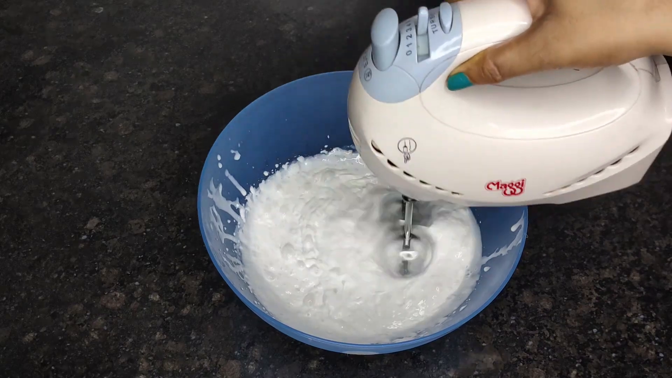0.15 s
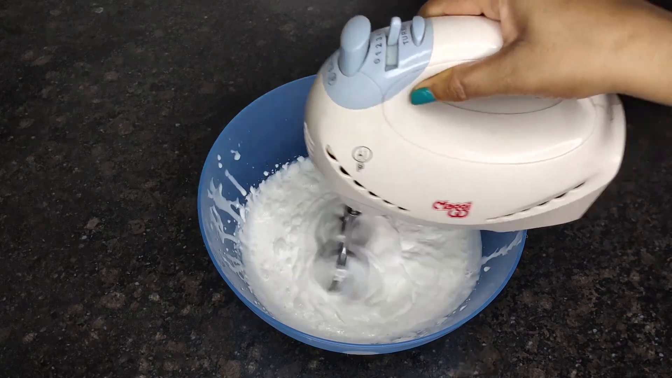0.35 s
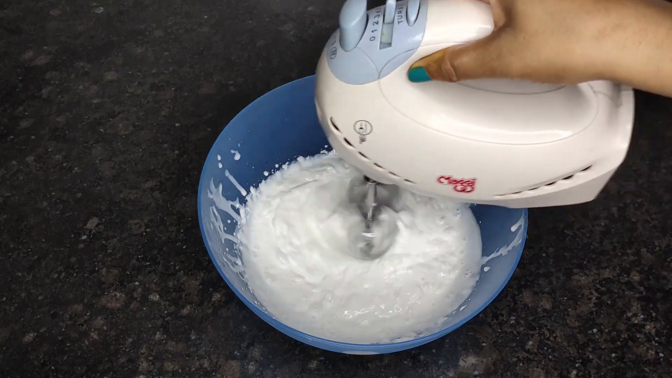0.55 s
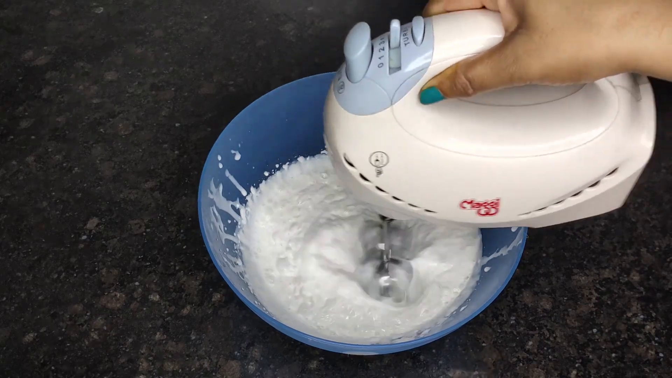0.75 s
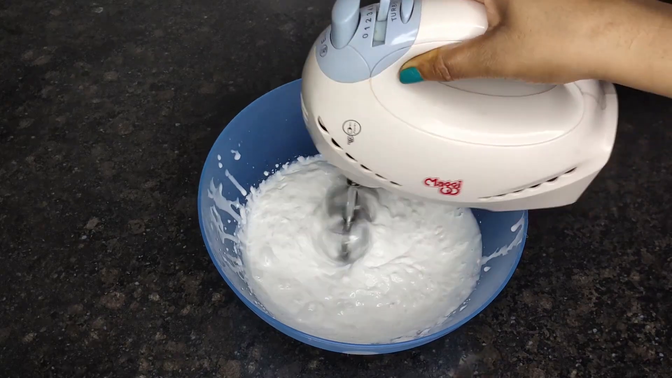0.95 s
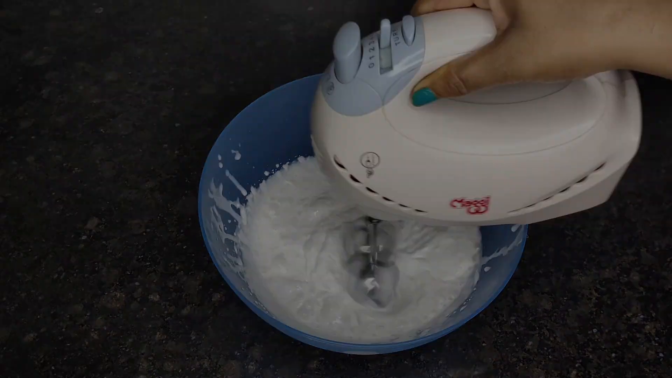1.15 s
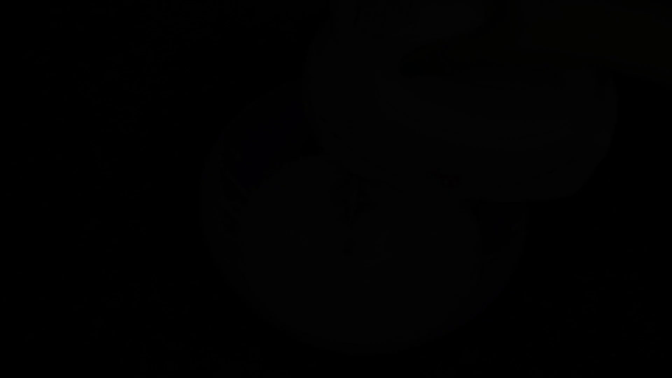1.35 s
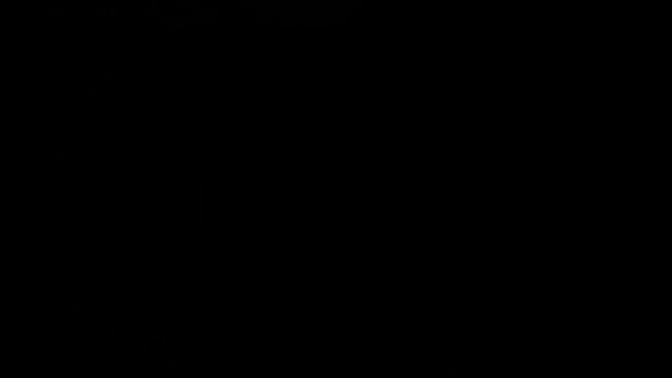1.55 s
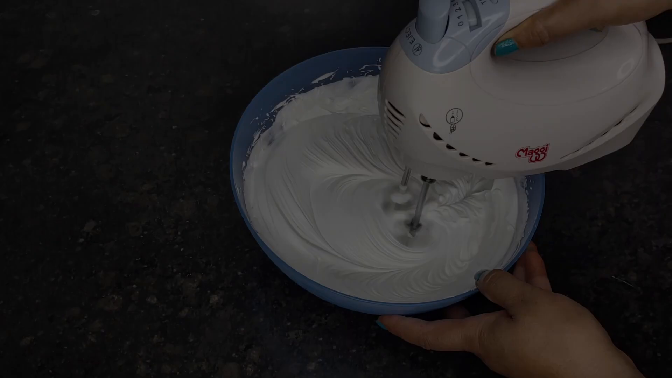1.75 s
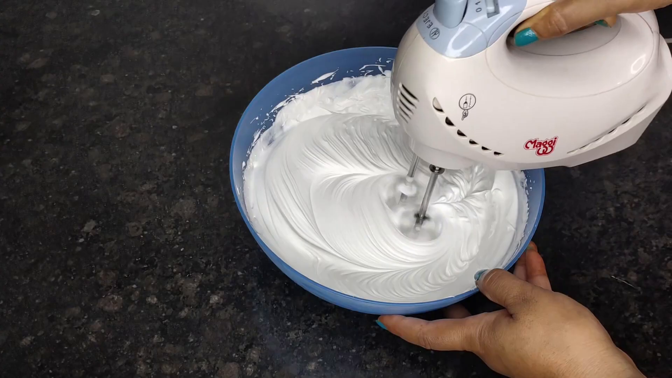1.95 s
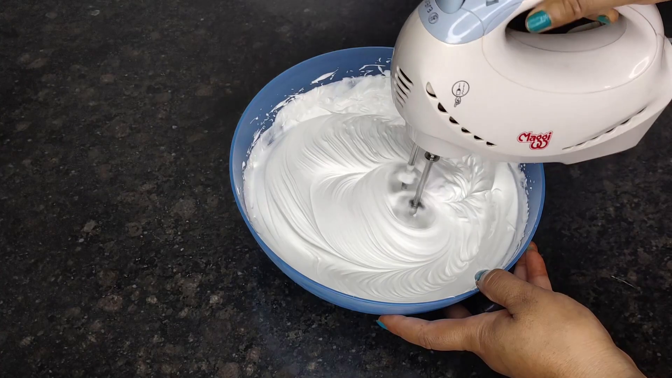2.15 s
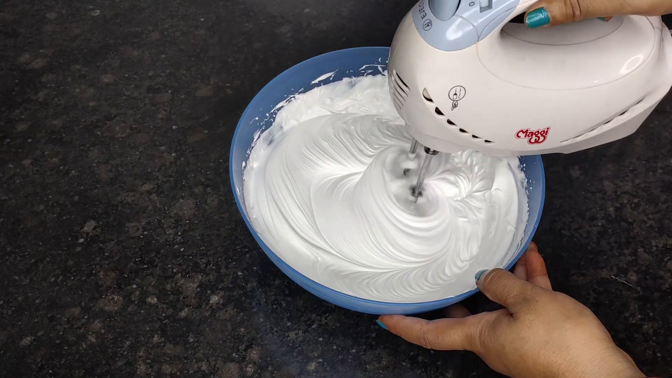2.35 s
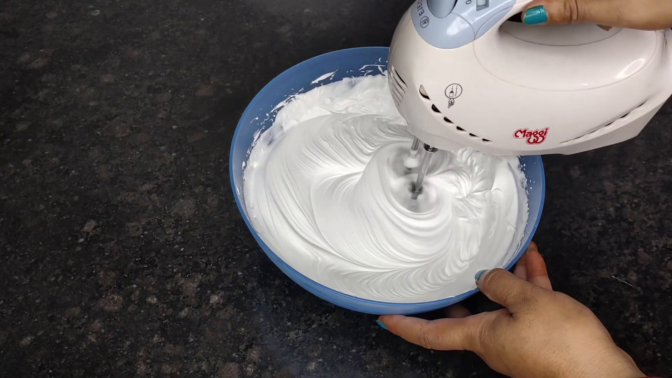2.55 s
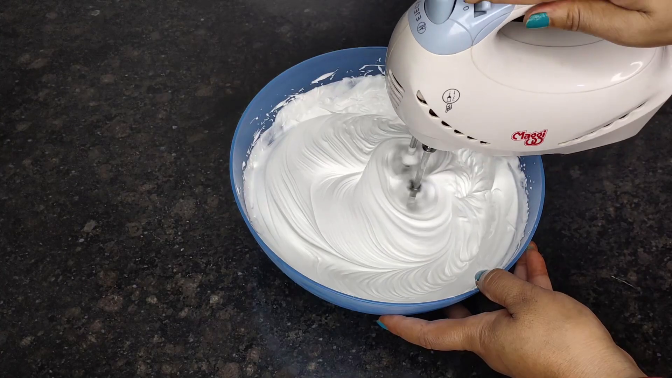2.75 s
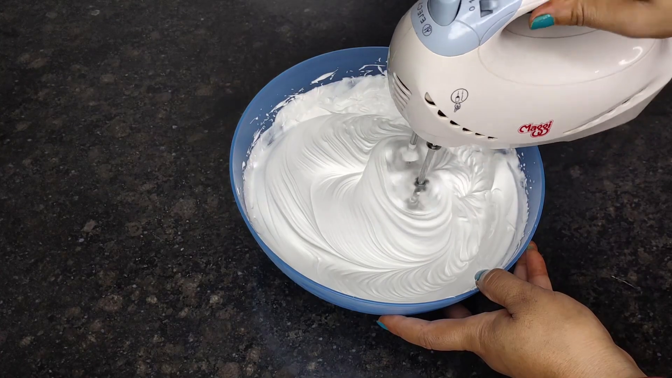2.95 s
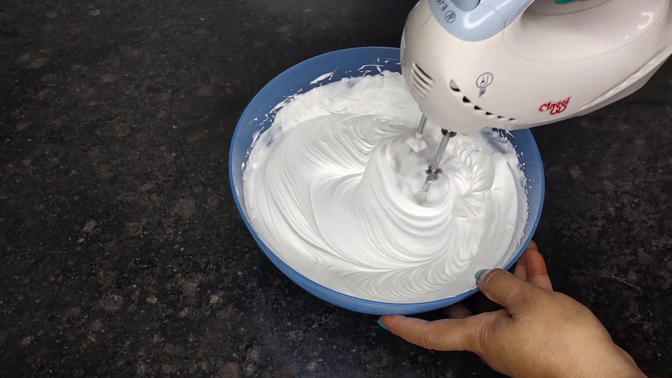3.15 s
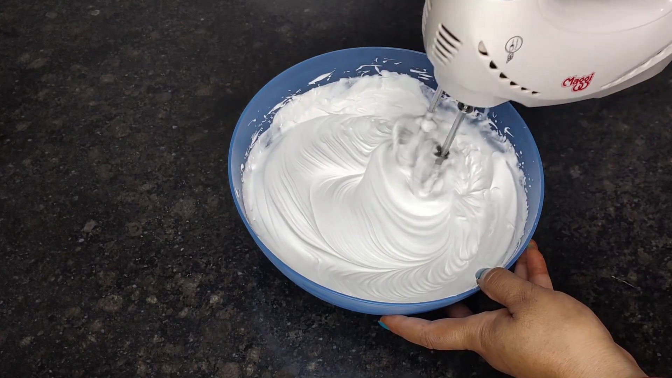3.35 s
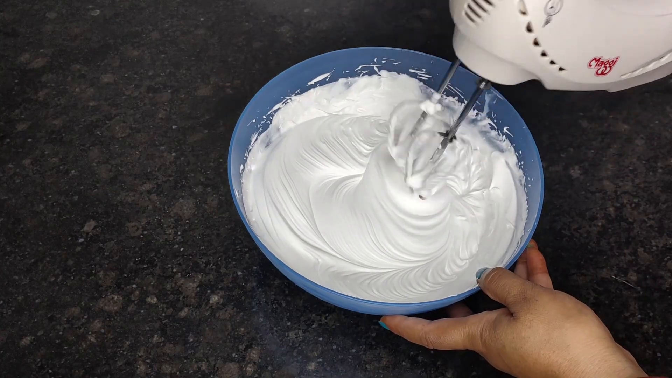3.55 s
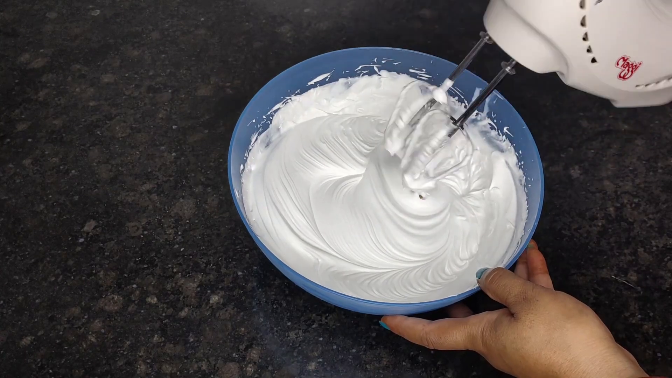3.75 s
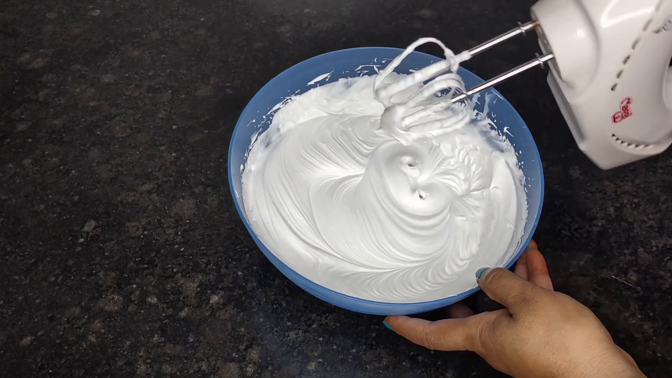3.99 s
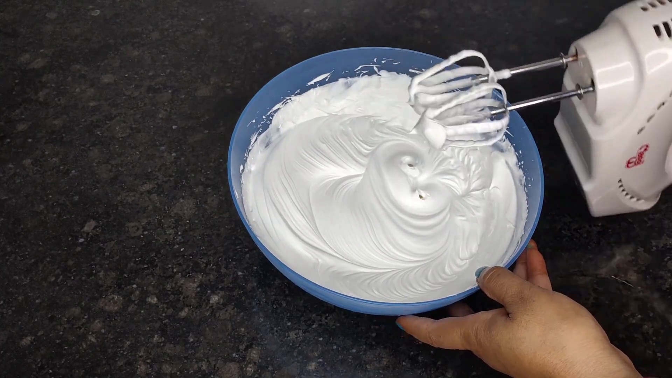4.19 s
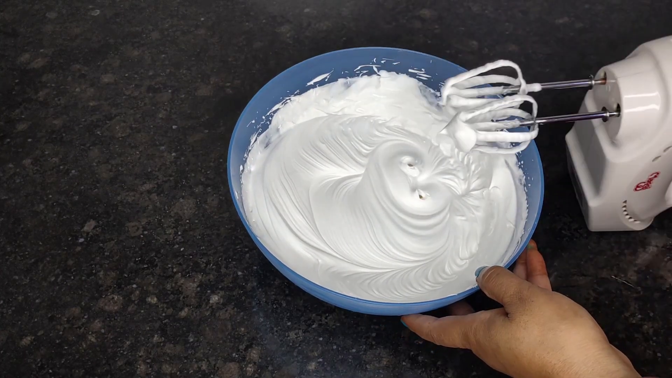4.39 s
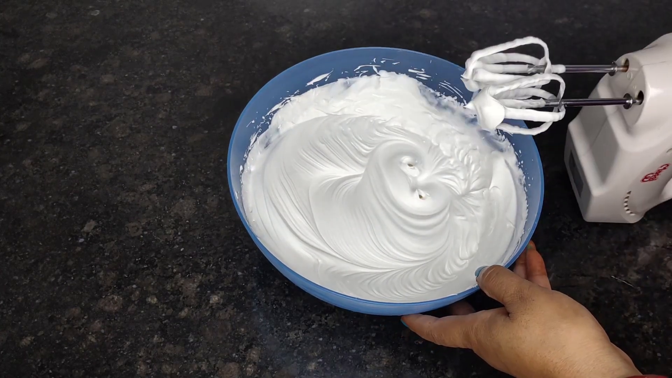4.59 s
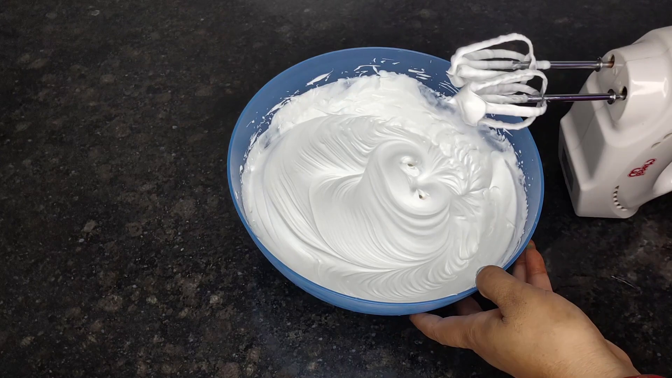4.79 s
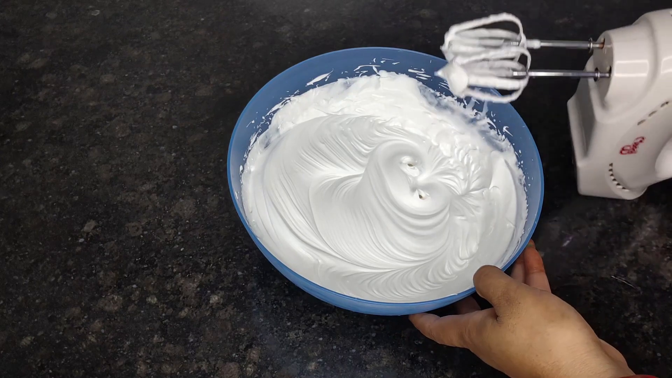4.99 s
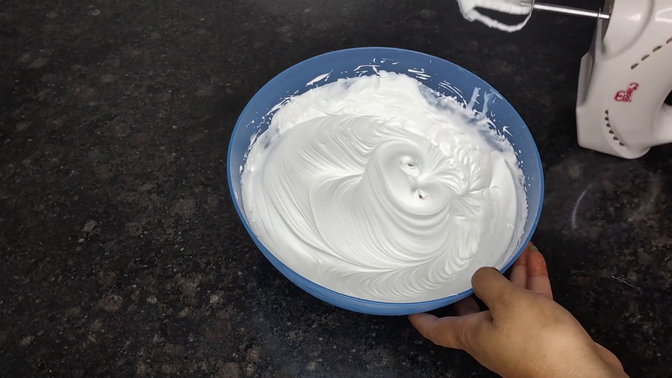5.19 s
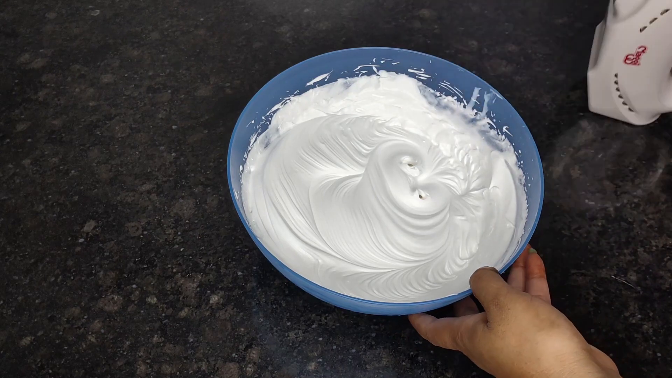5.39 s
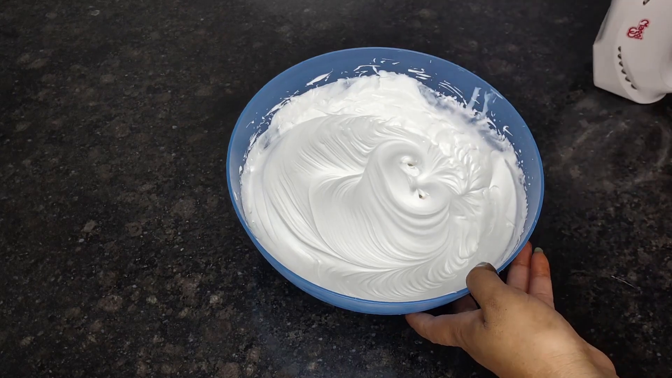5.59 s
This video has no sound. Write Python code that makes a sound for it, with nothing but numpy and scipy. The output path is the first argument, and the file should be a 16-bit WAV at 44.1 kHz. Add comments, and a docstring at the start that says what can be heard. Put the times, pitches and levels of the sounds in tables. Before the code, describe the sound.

A close mono pickup in a small kitchen. From 0 s an electric hand mixer runs at steady speed in runny cream: a hum near 650 Hz, high whines, gear rattle, brush hiss, wet slaps and small beater taps on the plastic bowl, strongest around 0.8-1.1 s. The level dips to a very short silence at about 1.55 s, then returns in stiff cream with less hum; from 1.9 s the hiss is clearly brighter. From 2.15 to 3.1 s the bowl groans on a slowly sinking note, with taps near 2.6-2.9 s. At 2.9 s the motor is switched off and coasts down, hollow tones fluttering and shooting upward near 3.7-3.9 s with a spray of hiss. Gears rattle unevenly to rest by 4.3 s, with a squeak at 4.0 s. Then quiet: a plastic knock at 4.5 s, scrapes and squeaks around 4.9-5.1 s, juddering worktop contacts at 5.2-5.3 s, soft hiss remaining.

```python
"""Whipping cream in a small kitchen

One microphone hears an electric hand mixer in a plastic bowl: shaft tones whine, grains of noise make
the thuds, slaps and gear rattle, and filtered noise makes the brush hiss. A cut with a moment of silence
parts runny from stiff cream, where the hiss is brighter; the bowl groans on a sinking, rubbed note. The
motor is switched off and coasts down as the beaters lift out. Noise bursts knock the mixer and set it down
on the worktop; damped tones ring and squeak. Room tone and mains hum lie beneath; a soft hiss remains."""
import sys
import numpy as np
from scipy import signal
from scipy.fft import rfft, irfft, next_fast_len
from scipy.io import wavfile
from scipy.ndimage import map_coordinates

SR = 44100
rng = np.random.default_rng(int(sys.argv[2]) if len(sys.argv) > 2 else 0)


def log_audio(samples):
    """Write samples as a 16-bit WAV file to the path given in sys.argv[1]."""
    # one column per channel
    frames = np.atleast_2d(samples).T
    # limit to full scale, then quantise
    limited = np.clip(frames, -1, 1)
    pcm = np.round(limited * 32767).astype(np.int16)
    wavfile.write(sys.argv[1], SR, pcm)


N = 248278
TIME = np.arange(N) / SR
TOP_HZ = 15700  # band limit of the recorder

# Every level_db below is a starting level, which the source may trim or shape.
# Motor speed under power, giving with the load: start_s, turns_per_s
SHAFT_SPEED = [(0, 330.5), (.344, 327.4), (.582, 329), (.808, 327.5), (.842, 325.7), (.94, 327.2),
               (1.274, 326.6), (1.422, 328.3), (1.6, 326.2), (1.916, 327.3), (2.3, 328)]
# Motor tones: multiple of the shaft speed, runny_level_db, stiff_level_db
SHAFT_TONES = [(1.997, -33.5, -47), (8.98, -53, -60), (11.95, -52.5, -55), (14, -54, -53),
               (15.02, -54.5, -46), (17, -54, -53.5), (17.98, -53, -60), (19.04, -52.5, -53),
               (20.12, -48, -47.5), (21.1, -47.5, -55), (22.05, -47, -44.5), (23.93, -47.5, -46),
               (25.06, -48.5, -55.5), (27, -57.5, -60), (29, -58.5, -50.5), (30.8, -54, -52.5),
               (32.1, -56, -57), (34.14, -53.5, -59.5), (35.6, -55, -61.5), (37.4, -56.5, -64),
               (39, -63, -62.5)]
# A cut with a moment of silence parts the two stages: start_s, end_s
CUT = (1.544, 1.584)
# Colour of the runny cream: pitch_hz, level_db
RUNNY_COLOUR = [(60, -43.5), (110, -35), (170, -18), (267, -12), (310, -14.5), (411, -15.5), (491, -10),
                (545, -8.5), (652, -3), (713, -9.5), (904, -17.5), (1270, -14), (1710, -24.5),
                (2310, -22.5), (3500, -32.5)]
# Colour of the stiff cream with the beaters deep: pitch_hz, level_db
STIFF_COLOUR = [(53, -66.5), (90, -18), (140, -21.5), (194, -10), (247, -10), (357, -9), (398, -14.5),
                (463, -7.5), (516, -14), (620, -6), (868, -11.5), (1220, -7.5), (1680, -19), (2140, -15.5),
                (3500, -26.5), (4550, -56.5), (7700, -120)]
# Colour with the beaters lifted free: pitch_hz, level_db
FREE_COLOUR = [(120, -73), (200, -44), (263, -20.5), (312, -30.5), (347, -16.5), (405, -18.5), (460, -1),
               (545, -4.5), (650, -3), (760, -11), (900, -2.5), (1040, -6), (1310, 0), (1710, -13.5),
               (2140, -8.5), (2590, -17.5), (3500, -39), (4550, -43), (7700, -120)]
# Colour of the brush hiss in runny cream: pitch_hz, level_db
RUNNY_HISS = [(2500, 7.5), (2800, 1), (3400, -6.5), (3900, -5), (7500, -6), (8600, -8.5), (12000, -13.5),
              (15500, -22)]
# Colour of the brush hiss in stiff cream: pitch_hz, level_db
STIFF_HISS = [(1470, -33.5), (2500, -4), (2780, -1.5), (3520, -10), (3800, -5), (4750, -1.5), (5920, -4.5),
              (7170, -2), (8230, -3), (10100, -3.5), (12400, -13.5), (14100, -14.5), (15500, -19.5)]
# Colour of the room tone: pitch_hz, level_db
ROOM_COLOUR = [(25, -3.5), (170, -7), (290, -9), (420, -8.5), (900, -10), (1400, -23.5), (1900, -33.5),
               (15000, -39)]
# Colour of the soft hiss that remains: pitch_hz, level_db
LATE_HISS_COLOUR = [(1500, -31.5), (2500, -24.5), (2900, -6), (4800, -3), (9800, -5.5), (15500, -14)]
# Colour of the knocked case: pitch_hz, level_db
KNOCK_COLOUR = [(150, -53.5), (250, -30), (371, -20), (480, -3), (540, 1), (640, -8), (750, -6.5),
                (844, -4.5), (1090, -20.5), (1240, -11.5), (1890, -30.5), (2850, -27.5), (4600, -21),
                (5850, -31), (9450, -33), (15000, -47.5)]
# Colour of the heel on the worktop: pitch_hz, level_db
HEEL_COLOUR = [(110, -58), (180, -40), (280, -9.5), (443, -4), (522, -2.5), (689, -2.5), (811, -20.5),
               (1020, -5.5), (1440, -11.5), (1930, -23), (2200, -17.5), (9000, -27), (14000, -47)]
# Resonances of bowl and beaters: pitch_hz, width_hz, lift_db
BOWL_MODES = [(272, 26, 3.5), (457, 32, 2.5), (575, 46, 4.5), (752, 44, 6.5)]
# The beaters strike the bowl: start_s, level_db, pitch_hz
STRIKES = [(.074, -20, 534), (.365, -19.5, 502), (.474, -23.5, 640), (0.502, -24.5, 956),
           (.821, -17.5, 670), (.847, -14, 630), (.862, -16.5, 774), (.902, -19, 476.6),
           (1.087, -13.5, 640), (1.719, -24.5, 474), (1.721, -29.5, 250), (2.18, -20, 653),
           (2.61, -21.5, 940), (2.683, -17.5, 1060), (2.77, -23, 735), (2.792, -21, 614),
           (2.909, -19.5, 460), (3.354, -28, 950)]
# Soft rings of the handled mixer: start_s, peak_db, pitch_hz, t60_s
RINGS = [(3.755, -48.5, 259, 0.19), (4.24, -58, 1494, 0.37), (4.271, -69, 4580, .2), (4.62, -62, 4730, 0.3),
         (4.71, -69, 3760, 0.22), (4.69, -67, 3040, 0.1), (4.725, -54.5, 254, 0.12),
         (4.96, -68, 1610, 0.28), (4.975, -71, 3000, 0.203), (4.968, -71, 4020, 0.28),
         (5.06, -60.5, 1246, 1), (5.505, -57, 588, 0.061)]
# The mixer's case knocks: start_s, level_db
KNOCKS = [(4.522, -38), (4.528, -27.5), (4.541, -43)]
# The heel judders on the worktop: start_s, level_db, brightness_hz
HEEL_CONTACTS = [(5.179, -33.5, 700), (5.2, -34, 750), (5.219, -35.5, 9000), (5.228, -41.5, 5000),
                 (5.246, -33.5, 1400), (5.272, -39.5, 2500), (5.294, -49, 900)]
# Course of the late hiss: start_s, level_db
LATE_HISS = [(4.95, -93), (5.045, -69), (5.058, -60.5), (5.17, -62.5), (5.186, -55.5), (5.63, -58.5)]
# The case slides on the worktop: start_s, level_db, squeal_hz
SCRAPES = [(4.903, -46.5, 5050), (5.051, -45.5, 5570)]
# Colour of the sliding case: pitch_hz, level_db
SCRAPE_COLOUR = [(1500, -22), (2200, -39), (4200, -29), (4800, -1), (6500, -6), (10000, -10),
                 (14000, -31.5)]
# The hand pushes the beaters into the cream; the negative row is a fade around the cut:
# centre_s, half_length_s, load_db
PUSHES = [(0.21, 0.037, 8.5), (0.39, 0.061, 8.5), (0.874, 0.075, 16), (1.53, 0.142, -10), (1.703, 0.063, 9),
          (2.186, 0.082, 8), (2.76, .11, 11.5), (2.953, 0.14, 8.5)]
# Modes of the gear housing: pitch_hz, width_hz, level_db
HOUSING_MODES = [(1086, 98, 4), (1222, 160, -4.5), (2036, 100, -8), (2240, 120, -16), (2810, 60, -14),
                 (3240, 60, -21), (3800, 60, -20), (4560, 170, -10)]
# The rising beaters graze the cream and spray it: centre_s, half_length_s, lift_db on hiss and rattle
SPRAYS = [(3.349, 0.062, 2.5), (3.572, 0.076, 2), (3.822, 0.076, 8)]
# The hollow that the blades dig in the cream: start_s, pitch_hz, level_db
HOLLOW = [(2.88, 928, -62), (2.98, 930, -45), (3.07, 985, -37.5), (3.11, 1150, -44), (3.21, 1133, -35.5),
          (3.29, 1061, -60), (3.355, 956, -37), (3.43, 975, -48), (3.48, 961, -41.5), (3.61, 944, -43.5),
          (3.67, 1088, -46), (3.715, 1285, -39), (3.742, 1530, -39), (3.765, 1990, -50),
          (3.81, 2094, -45.5), (3.855, 2280, -44.5), (3.91, 2446, -62)]
# The bowl's sinking note: start_s, pitch_hz, level_db
GROAN = [(2.15, 652, -47), (2.24, 645, -32), (2.36, 640, -50.5), (2.5, 629, -35), (2.57, 626, -41.5),
         (2.64, 621, -31), (2.74, 603, -32.5), (2.83, 592, -32.5), (2.96, 572, -46.5), (3.12, 566, -54)]
# The bowl drones under pressure: centre_s, half_length_s, pitch_hz, level_db, roughness (share of pitch)
DRONES = [(1.697, 0.046, 119.7, -50, .13), (1.802, 0.034, 112, -59, 0.11), (2.501, 0.098, 203, -48, 0.07),
          (2.898, 0.11, 199, -41.5, .055), (3.078, 0.066, 202.6, -46.5, 0.072),
          (3.034, 0.19, 454, -41.5, 0.013), (3.26, 0.13, 351, -52.5, 0.0786)]
# Squeaks of beaters and case: start_s, length_s, start_hz, end_hz, level_db, roughness (share of pitch)
SQUEAKS = [(4.012, 0.043, 1070, 1115, -42.5, 0.026), (4.913, 0.041, 1030, 1108, -52, 0.11),
           (5.054, .04, 2290, 2140, -59.5, 0.042), (5.09, .021, 583, 560, -41.5, 0.015)]

OFF_S, STOP_S = 2.88, 4.284  # switched off; friction has brought it to rest
CLEAR_S = 4.116  # the blades stop flinging cream
CREAM_POWER, RATTLE_POWER, HISS_POWER = 1.24, 1.51, 1.36  # amplitude goes with this power of the speed
BRIGHT_S, BRIGHT_END_S, BRIGHT_DB = 1.89, 2.887, 6  # the hiss stands higher in the worked stiff cream
DIP_DB, DIP_LEN_S = -4.5, 0.26  # the level dips on both sides of the cut
WHINE_DROP_S, WHINE_DROP_DB = 3, -6.5  # the whine drops further soon after switch-off
BLADE_RATIO = 0.185  # blade passes for each turn of the motor
CIRCLE_HZ = 2.2  # the hand circles the bowl this often
SOUND_M_PER_S = 343


def amp(db):
    """Decibels to gain."""
    return 10 ** (np.asarray(db) / 20)


def unit(x):
    """Scale to rms 1."""
    return x / np.sqrt(np.mean(x ** 2) + 1e-20)


def curves(rows):
    """One value per sample for each column after the time."""
    s, *cols = np.transpose(rows)
    return [np.interp(TIME, s, c) for c in cols]


def swell(s, half_len):
    """A smooth rise to 1 and back, centred on time s."""
    return np.exp(-((TIME - s) / half_len) ** 2)


def ramp(s, length):
    """A straight rise from 0 to 1, centred on time s."""
    return np.clip((TIME - s) / length + .5, 0, 1)


def wobble(rate):
    """A smooth random curve with rate knots a second."""
    coarse = TIME[::16]
    knots = rng.standard_normal(int(N * rate / SR) + 4)
    return np.interp(TIME, coarse, map_coordinates(knots, [coarse * rate]))


def along(points, hz):
    """Gain of (pitch_hz, level_db) points on a log axis."""
    f, db = np.transpose(points)
    return amp(np.interp(np.log(hz + 1), np.log(f + 1), db))


def band(hz, lo_hz, hi_hz):
    """Gain of a steep band-pass."""
    return ((1 + (lo_hz / (hz + 1)) ** 12) * (1 + (hz / hi_hz) ** 12)) ** -.5


def coloured(x, gain):
    """x through the causal, minimum-phase filter with this gain over frequency."""
    size = 2 * next_fast_len(N // 2 + 8192)
    log_gain = np.log(np.maximum(gain(np.fft.rfftfreq(size, 1 / SR)), 1e-6))
    cepstrum = irfft(log_gain)
    # folding the cepstrum onto positive time makes the filter causal
    cepstrum[1:size // 2] *= 2
    cepstrum[size // 2 + 1:] = 0
    return irfft(rfft(x, size) * np.exp(rfft(cepstrum)))[:N]


def grains(rate, spread_db):
    """Random tiny impacts of uneven size, rms 1."""
    hits = (rng.random(N) < rate / SR) * rng.choice([-1, 1], N)
    return unit(hits * amp(spread_db * np.clip(rng.standard_normal(N), -2, 2)))


def add(track, s, sound):
    """Mix a sound into the track at time s."""
    part = track[round(s * SR):][:len(sound)]
    part += sound[:len(part)]


def burst(t60):
    """Noise that dies away."""
    t = np.arange(SR // 2) / SR
    return rng.standard_normal(len(t)) * amp(-60 * t / t60)


def rubbed(hz, rough, shake_rate, flicker_db):
    """A rubbed note, unsteady in pitch and level, rms 1."""
    cycles = np.cumsum(hz * (1 + rough * wobble(shake_rate))) / SR
    return unit(np.sin(2 * np.pi * cycles) * amp(flicker_db * wobble(shake_rate)))


def resonance(cycles, relative_width):
    """Noise in a moving resonance whose width is a fixed share of its pitch."""
    knots = rng.standard_normal((2, N // 8))
    a, b = (map_coordinates(k, [cycles * relative_width]) for k in knots)
    return unit(a * np.cos(2 * np.pi * cycles) + b * np.sin(2 * np.pi * cycles))


def kitchen(x, wet_db, t60):
    """Direct sound plus the quick answer of worktop and walls, which changes as the mixer moves."""
    hop = SR // 4
    padded = np.pad(x, (hop, 2 * hop))
    pieces = np.lib.stride_tricks.sliding_window_view(padded, 2 * hop)[::hop]
    pieces = pieces * np.sin(np.pi * np.arange(2 * hop) / (2 * hop))
    # each overlapping piece gets a fresh noise tail, silent for the first 2.5 ms
    tails = rng.standard_normal((len(pieces), hop)) * amp(-60 * np.arange(hop) / SR / t60)
    tails[:, :SR // 400] = 0
    tails = tails / np.linalg.norm(tails, axis=1, keepdims=True)
    answers = signal.fftconvolve(pieces, tails, axes=1)
    wet = np.zeros(N + hop)
    for k, answer in enumerate(answers):
        add(wet, k * hop / SR, answer)
    return (x + amp(wet_db) * wet[hop:]) / np.sqrt(1 + amp(wet_db) ** 2)


def background(tone_db=-73, mains_db=-83, hiss_trim_db=1.5):
    """Faint room tone with mains hum, and a soft hiss that swells at the end."""
    tone = unit(coloured(rng.standard_normal(N), lambda hz: along(ROOM_COLOUR, hz)))
    mains = unit(np.sin(2 * np.pi * 50 * TIME))
    hiss = unit(coloured(rng.standard_normal(N), lambda hz: along(LATE_HISS_COLOUR, hz)))
    hiss_level = amp(curves(LATE_HISS)[0] + hiss_trim_db)
    return amp(tone_db) * tone + amp(mains_db) * mains + hiss_level * hiss


def heel(contact_s=0.057, grit_db=5.0):
    """The heel lands softly on the worktop, then judders in gritty noise bursts."""
    track = np.zeros(N)
    for s, db, top_hz in HEEL_CONTACTS:
        blow = burst(contact_s)
        blow = blow * amp(grit_db * rng.standard_normal(len(blow)))
        lowpass = signal.butter(2, min(top_hz, TOP_HZ), fs=SR)
        add(track, s, amp(db) * signal.lfilter(*lowpass, blow))
    sound = kitchen(coloured(track, lambda hz: along(HEEL_COLOUR, hz)), wet_db=3.0, t60=0.27)
    return amp(max(row[1] for row in HEEL_CONTACTS)) * sound / np.abs(sound).max()


def case_blows(rows, colour, contact_s, wet_db, t60, trim_db):
    """Noise bursts excite the hollow plastic case; the whole is scaled to the loudest row."""
    track = np.zeros(N)
    for s, db in rows:
        add(track, s, amp(db) * burst(contact_s))
    sound = kitchen(coloured(track, colour), wet_db, t60)
    return amp(max(db for s, db in rows) + trim_db) * sound / np.abs(sound).max()


def scrapes(squeal_db=12, width_hz=450):
    """Each slide of the case on the worktop hisses round a squeal of its own."""
    track = np.zeros(N)
    for s, db, squeal_hz in SCRAPES:
        def colour(hz):
            squeal = amp(squeal_db / (1 + (2 * (hz - squeal_hz) / width_hz) ** 2))
            return along(SCRAPE_COLOUR, hz) * squeal
        track += case_blows([(s, db)], colour, contact_s=0.25, wet_db=0.5, t60=0.81, trim_db=-1.5)
    return track


def knocks():
    """Short blows on the hollow plastic case."""
    return case_blows(KNOCKS, lambda hz: along(KNOCK_COLOUR, hz),
                      contact_s=0.035, wet_db=2.5, t60=0.34, trim_db=-0.5)


def squeaks():
    """Short gliding rubs of beaters and case, each left hanging in the room."""
    track = np.zeros(N)
    for s, length, start_hz, end_hz, db, rough in SQUEAKS:
        progress = ramp(s + length / 2, length)
        hz = start_hz + (end_hz - start_hz) * progress
        envelope = np.abs(np.sin(np.pi * progress)) ** .5
        track += amp(db) * envelope * rubbed(hz, rough, shake_rate=400, flicker_db=-0.5)
    return kitchen(track, wet_db=-4.5, t60=0.48)


def rings(attack_s=0.0077, rasp=0.061, width_hz=85):
    """Clusters of close modes in the case and the wire beaters, softly rubbed."""
    track, t = np.zeros(N), np.arange(SR // 2) / SR
    for s, db, hz, t60 in RINGS:
        detune, phase = rng.random((2, 24, 1))  # 24 modes, spread wider at higher pitch
        mode_hz = hz + width_hz * np.sqrt(hz / 1000) * (detune - .5)
        ring = np.sin(2 * np.pi * (mode_hz * t + phase)).sum(0)
        ring = unit(ring) + rasp * rng.standard_normal(len(t))
        ring = ring * amp(-60 * t / t60) * (1 - np.exp(-t / attack_s))
        add(track, s, amp(db) * ring / np.abs(ring).max())
    return track


def strikes(trim_db=-1, crack=0.087, peak_s=0.0033):
    """A beater wire hits the bowl: a short damped note with a little crack."""
    track, t = np.zeros(N), np.arange(SR // 2) / SR
    for s, db, hz in STRIKES:
        envelope = (t / peak_s * np.exp(1 - t / peak_s)) ** 2
        note = np.sin(2 * np.pi * hz * t) * envelope
        add(track, s, amp(db + trim_db) * (note + crack * burst(.012)))
    return kitchen(track, wet_db=-6.0, t60=0.23)


def groan(trim_db=0.5, fade_s=0.088):
    """Stiff cream dragged round the bowl groans on a slowly sinking note, with drones besides."""
    hz, db = curves(GROAN)
    sounding = ramp(GROAN[0][0], fade_s) - ramp(GROAN[-1][0], fade_s)
    sound = sounding * amp(db + trim_db) * rubbed(hz, rough=.014, shake_rate=90, flicker_db=2.5)
    for s, half_len, drone_hz, drone_db, rough in DRONES:
        drone = rubbed(drone_hz, rough, shake_rate=80, flicker_db=2.0)
        sound = sound + amp(drone_db) * swell(s, half_len) * drone
    return sound


def hollow(core_db=-3, core_fade=1.2, skirt_width=.2, skirt_db=-5,
           overtone_ratio=2.16, overtone_width=.17, pull_s=3.78):
    """The hollow sings under the blades; as they pull out it shoots up, frays and gains a hissing overtone."""
    hz, db = curves(HOLLOW)
    cycles = np.cumsum(hz) / SR
    rough = .018 * (hz / hz[0]) ** 1.9
    core = (hz[0] / hz) ** core_fade * rubbed(hz, rough, shake_rate=300, flicker_db=2.5)
    skirt = resonance(cycles, skirt_width)
    overtone = ramp(pull_s, 0.036) * resonance(overtone_ratio * cycles, overtone_width)
    sounding = (TIME > HOLLOW[0][0]) * (TIME < HOLLOW[-1][0])
    return sounding * amp(db) * (amp(core_db) * core + amp(skirt_db) * skirt + overtone)


def speed():
    """Share of full speed: 1 under power, then falling evenly to rest."""
    return np.interp(TIME, [OFF_S, STOP_S], [1, 0])


def housing(level_db=-51, power=0.43, lumpy_db=2, free_s=3.8):
    """Once the beaters are free, the coasting gears ring their housing unevenly until they stop."""
    def modes(hz):
        return sum(amp(db) / (1 + (2 * (hz - f) / width) ** 2) ** 2 for f, width, db in HOUSING_MODES)
    ringing = unit(coloured(grains(900, 3.2) * amp(lumpy_db * wobble(24.84)), modes))
    sounding = ramp(free_s, 0.17) * (1 - ramp(STOP_S - .05, 0.2))
    return amp(level_db) * sounding * (speed() + 0.011) ** power * ringing


def load_db():
    """How hard the cream resists the beaters, with the fade around the cut."""
    return sum(db * swell(s, half_len) for s, half_len, db in PUSHES)


def shaft_turns(flutter=0.0004):
    """Turns of the motor, whose speed shakes a little."""
    hz = curves(SHAFT_SPEED)[0] * speed()
    return np.cumsum(hz * (1 + flutter * wobble(45))) / SR


def bowl(hz):
    """Lift given by the resonances of bowl and beaters."""
    return amp(sum(db / (1 + (2 * (hz - f) / width) ** 2) for f, width, db in BOWL_MODES))


def whipping(body, turns, thud_db, slap_db, rattle_db, slap_follows, rattle_follows, slaps_per_s, lumpy_db):
    """Cream lumps thud, blades slap them on the bowl, gear teeth rattle once a turn."""
    load = load_db()  # followed in full by the thuds, by a share by the others
    blows = kitchen(grains(slaps_per_s, 4.24) * amp(lumpy_db * wobble(60)), wet_db=-1.5, t60=0.22)
    teeth = grains(2200, 2.6) * (1 + .5 * np.cos(2 * np.pi * turns)) * amp(1.2 * wobble(70))
    teeth = kitchen(teeth, wet_db=-3.0, t60=0.24)
    thud = unit(coloured(blows, lambda hz: body(hz) * band(hz, 95, 322)))
    slap = unit(coloured(blows, lambda hz: body(hz) * band(hz, 348, 915)))
    rattle = unit(coloured(teeth, lambda hz: body(hz) * band(hz, 895, 3100)))
    cream = amp(thud_db + load) * thud + amp(slap_db + slap_follows * load) * slap
    gears = amp(rattle_db + rattle_follows * load) * rattle
    return (cream * speed() ** CREAM_POWER + gears * speed() ** RATTLE_POWER) * (1 - ramp(CLEAR_S, 0.11))


def worktop_echo(x, echo=0.31, path_m=0.4006, sway_m=0.015, rise_m_per_s=.16):
    """The worktop echo combs the hiss; the comb sways with the hand and slides down as the mixer lifts."""
    path = path_m + sway_m * wobble(5) + rise_m_per_s * np.maximum(TIME - OFF_S, 0)
    return x + echo * map_coordinates(x, [(TIME - path / SOUND_M_PER_S) * SR])


def brushes(colour, turns, level_db, gating, grit, throb=0.069, thin_hz=4000, thin_power=0.2):
    """Brushes scrape the commutator, harder twice a turn, softer and thinner as the motor slows."""
    scrape = rng.standard_normal(N) + grit * grains(2500, 4.9)
    twice_a_turn = gating * np.cos(4 * np.pi * turns)
    shaft_throb = throb * np.cos(2 * np.pi * turns)
    blade_throb = throb * np.cos(2 * np.pi * BLADE_RATIO * turns)
    scrape = scrape * (1 + twice_a_turn + shaft_throb + blade_throb)
    scrape = kitchen(scrape * amp(0.37 * wobble(50)), wet_db=-8, t60=0.072)
    hiss = unit(coloured(worktop_echo(scrape), lambda hz: along(colour, hz) * band(hz, 3110, 18000)))
    lower = signal.sosfiltfilt(signal.butter(10, thin_hz, fs=SR, output="sos"), hiss)
    thinned = hiss - (1 - speed() ** thin_power) * lower
    return amp(level_db) * speed() ** HISS_POWER * thinned


def hum(turns, level_db, beat=0.42, damping=0.1):
    """The lowest motor tone: the blades beat on it, the load damps it."""
    blades = 1 + beat * np.cos(2 * np.pi * (BLADE_RATIO * turns + 0.29 * wobble(11)))
    tone = unit(blades * amp(0.4 * wobble(35)) * np.sin(2 * np.pi * SHAFT_TONES[0][0] * turns))
    return tone * amp(level_db - damping * np.maximum(load_db(), 0))


def motor(turns, levels_db, sway_m, echo=.8, release_db_per_s=90, count=3):
    """Shaft tones swell and fade against echoes whose paths sway with the hand; all die after switch-off."""
    late_turns = []
    for _ in range(count):  # echoes off bowl and worktop
        sway = np.cos(2 * np.pi * (CIRCLE_HZ * TIME + rng.random())) + wobble(3)
        path_m = rng.random() + sway_m * sway
        late_turns.append(turns - SHAFT_SPEED[0][1] * path_m / SOUND_M_PER_S)
    whine = np.zeros(N)
    for (multiple, *_), db in zip(SHAFT_TONES[1:], levels_db[1:]):
        direct = np.sin(2 * np.pi * (multiple * turns + rng.random()))
        echoes = sum(np.sin(2 * np.pi * multiple * late) for late in late_turns)
        whine += amp(db) * unit(direct + echo * echoes)
    whine = whine * amp(WHINE_DROP_DB * ramp(WHINE_DROP_S, .1))
    return (hum(turns, levels_db[0]) + whine) * amp(-release_db_per_s * np.maximum(TIME - OFF_S, 0))


def runny_cream(turns):
    """The beaters spin easily and the motor's hum stands out."""
    cream = whipping(lambda hz: along(RUNNY_COLOUR, hz), turns, thud_db=-50.0, slap_db=-34.5,
                     rattle_db=-36.5, slap_follows=0.32, rattle_follows=0.24, slaps_per_s=800, lumpy_db=1.7)
    hiss = brushes(RUNNY_HISS, turns, level_db=-37.0, gating=0.097, grit=0.84)
    return cream + hiss + motor(turns, [row[1] for row in SHAFT_TONES], sway_m=.023)


def stiff_cream(turns, lift_s=3.044, lift_len_s=0.36, hiss_db=-33.5):
    """The beaters work the stiff cream, then rise from it and spin down freely."""
    spray_db = sum(db * swell(s, half_len) for s, half_len, db in SPRAYS)
    lifted = ramp(lift_s, lift_len_s)
    bright = ramp(BRIGHT_S, .04) - ramp(BRIGHT_END_S, 0.18)
    deep = whipping(lambda hz: along(STIFF_COLOUR, hz) * bowl(hz), turns, thud_db=-52.5, slap_db=-32.5,
                    rattle_db=-35, slap_follows=0.23, rattle_follows=0.36, slaps_per_s=800, lumpy_db=0.0)
    free = whipping(lambda hz: along(FREE_COLOUR, hz) * bowl(hz), turns, thud_db=-58.5, slap_db=-38.0,
                    rattle_db=-36.5 + spray_db, slap_follows=0, rattle_follows=0,
                    slaps_per_s=700, lumpy_db=-1.0)
    cream = deep * (1 - lifted) + free * np.sqrt(lifted)
    hiss_level_db = hiss_db + BRIGHT_DB * bright + spray_db
    hiss = brushes(STIFF_HISS, turns, hiss_level_db, gating=0.19, grit=0.45)
    return cream + hiss + motor(turns, [row[2] for row in SHAFT_TONES], sway_m=.011)


def mixer():
    """Runny cream, a cut with a moment of silence, stiff cream."""
    turns = shaft_turns()
    stages = runny_cream(turns) * (TIME < CUT[0]) + stiff_cream(turns) * (TIME > CUT[1])
    return stages * amp(DIP_DB * swell(np.mean(CUT), DIP_LEN_S))


def scene():
    """Everything reaches one microphone, written alike to both channels."""
    handling = heel() + scrapes() + knocks() + squeaks() + rings()
    bowl_and_gears = strikes() + groan() + hollow() + housing()
    mono = background() + handling + bowl_and_gears + mixer()
    return np.array([mono, mono])


def record(dry):
    """The recorder keeps nothing above its band limit."""
    size = next_fast_len(N + SR // 4)
    kept = np.fft.rfftfreq(size, 1 / SR) < TOP_HZ
    return irfft(rfft(dry, size) * kept, size)[:, :N]


dry = scene()
out = record(dry)
log_audio(out)
```